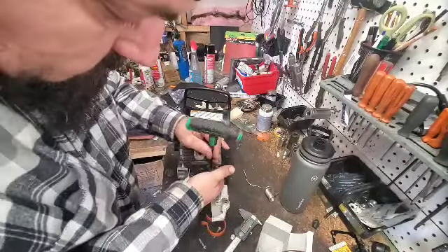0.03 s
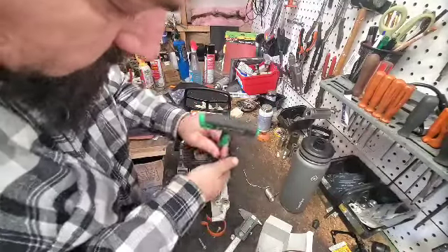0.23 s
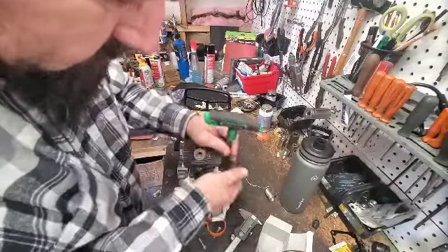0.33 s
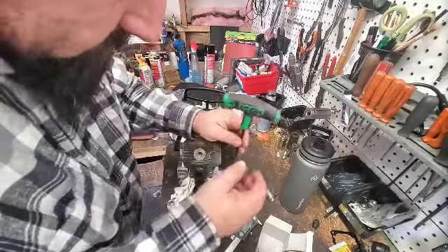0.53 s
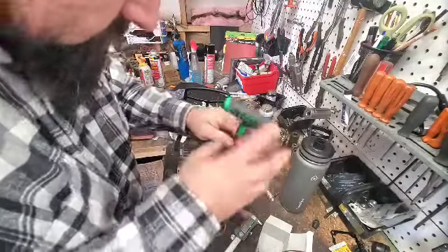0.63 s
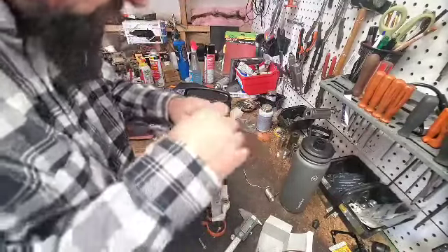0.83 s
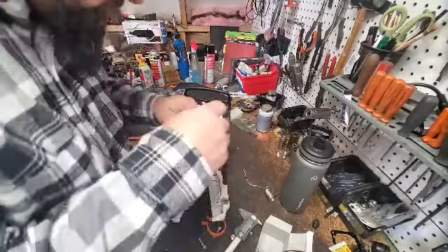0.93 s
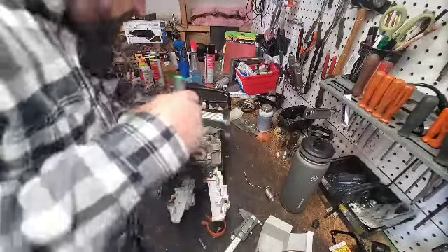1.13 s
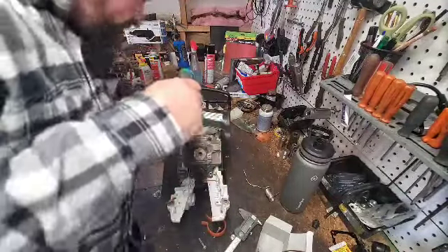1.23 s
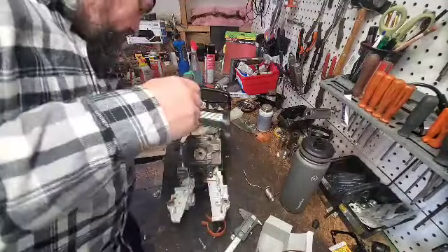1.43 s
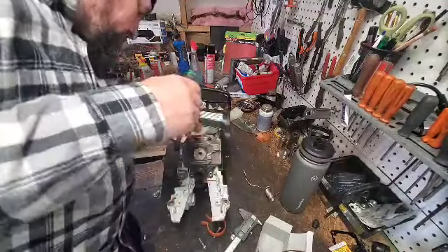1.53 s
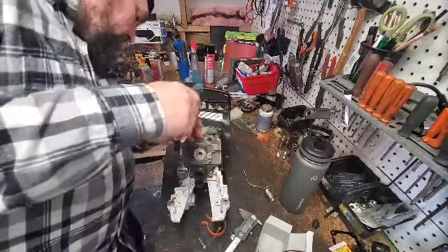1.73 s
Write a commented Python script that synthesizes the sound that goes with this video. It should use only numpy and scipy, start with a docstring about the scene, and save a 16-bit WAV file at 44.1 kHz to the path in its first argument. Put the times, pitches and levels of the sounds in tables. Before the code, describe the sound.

Small metal parts clink as a driver scrapes free, a bolt bounces, and a handle thuds down

```python
"""Engine parts on a shed workbench

A steel T-handle driver scrapes out of its hole and rings free, a loose bolt bounces, the driver's plastic
handle is put down and fingers tick on a small part: each is a damped noise burst plus ringing sine modes.
Scraping is dense random slips through a body's ringing. Coloured noise makes the bench shudder, the faint
sleeve, the room rumble and the hiss; the shed adds a short reverberation to the handling."""
import sys
import numpy as np
from scipy import signal
from scipy.fft import rfft, irfft
from scipy.io import wavfile

SR = 44100
rng = np.random.default_rng(int(sys.argv[2]) if len(sys.argv) > 2 else 0)


def unload_wav(signal):
    """Save mono or channel-first audio to the path in sys.argv[1] as 16-bit WAV at rate SR, clipped to [-1, 1]."""
    wavfile.write(
        sys.argv[1],
        SR,
        np.round(np.clip(np.atleast_2d(signal).T, -1, 1) * 32767).astype(np.int16),
    )


N = 79380
RING_S = 0.6
AGE_S = np.arange(int(RING_S * SR)) / SR

# left-right likeness: f/Hz, correlation
CORRELATION = [(40, .995), (90, .985), (180, .92), (350, .82), (700, .65), (1400, .15), (2800, .45),
               (5600, 0), (10000, -.2), (14000, .1)]


def from_db(db):
    """Decibels to gain."""
    return 10 ** (np.asarray(db) / 20)


def at_hz(points, hz):
    """Read a table on a log-frequency axis."""
    table_hz, values = np.array(points).T[:2]
    return np.interp(np.log(hz + 1), np.log(table_hz), values)


def level(curve):
    """A t/s, level/dB curve as gain; silent outside it."""
    times_s, levels_db = np.transpose(curve)
    return from_db(np.interp(np.arange(N) / SR, times_s, levels_db, left=-np.inf, right=-np.inf))


def dying(t60_s):
    """Exponential decay over the length of a ring: -60 dB at t60."""
    return np.exp(-np.log(1000) * AGE_S / t60_s)


def correlation_at(hz):
    """Left-right correlation at a frequency."""
    return np.clip(at_hz(CORRELATION, hz), -1, 1)


def noise(spectrum, size, tilt_db_per_oct=0, contact_hz=SR):
    """Stereo noise of a given colour, dulled by a soft contact; rms 1."""
    hz = np.fft.rfftfreq(size, 1 / SR)
    octaves = np.log2(np.clip(hz, 1000, None))  # tilt acts above 1 kHz only
    gain = from_db(at_hz(spectrum, hz) + tilt_db_per_oct * octaves)
    gain = gain / np.sqrt(1 + (hz / contact_hz) ** 8)
    alike = correlation_at(hz)
    mid, side = rfft(rng.standard_normal((2, size)))
    stereo = np.sqrt(1 + alike) * mid + np.sqrt(1 - alike) * side * [[1], [-1]]
    x = irfft(gain * stereo, size)
    return x / np.sqrt(np.mean(x ** 2))


def strike(spectrum, modes, t60_s, ring_db, tilt_db_per_oct=0, contact_hz=SR):
    """One blow: a crowd of quickly damped modes plus the body's few clear ones."""
    attack_s, mode_scatter_db = 0.00071, 0.93
    x = noise(spectrum, len(AGE_S), tilt_db_per_oct, contact_hz) * dying(t60_s)
    for hz, db, mode_t60_s in modes:
        # opposite phase shifts give the left-right correlation
        phase = np.arccos(correlation_at(hz)) / 2 * np.array([[1], [-1]])
        mode_gain = from_db(db + ring_db + mode_scatter_db * rng.standard_normal())
        x = x + mode_gain * np.sin(2 * np.pi * hz * AGE_S + phase) * dying(mode_t60_s)
    return np.sqrt(2) * x * (1 - np.exp(-AGE_S / attack_s))


def place(blows):
    """Lay (t/s, level/dB, sound) blows on the time line."""
    out = np.zeros((2, N + len(AGE_S)))
    for s, db, x in blows:
        start = min(int(s * SR), N)
        out[:, start:start + len(AGE_S)] += from_db(db) * x
    return out[:, :N]


def clinks(hits, spectrum, modes, t60_s):
    """A series of hard contacts on one metal body."""
    return place((s, db, strike(spectrum, modes, t60_s, ring_db, tilt_db_per_oct=tilt))
                 for s, db, tilt, ring_db in hits)


def convolve_unit_energy(x, response):
    """Convolve with a stereo response scaled to unit mean energy per channel."""
    response = response / np.sqrt(np.sum(response ** 2) / 2)
    return signal.fftconvolve(x, response, axes=1)[:, :N]


def scrape(force_db, body):
    """Dense tiny slips, scaled by the force on them, excite a body."""
    slips_per_s, slip_spread_db = 1200, -4.5
    happens = rng.random(N) < slips_per_s / SR
    sign = rng.choice([-1, 1], N)
    size = from_db(slip_spread_db * np.minimum(rng.exponential(1, N), 3))
    slips = happens * sign * size
    return convolve_unit_energy([level(force_db) * slips / slips.std()], body)


def room_floor():
    """Steady room rumble and hiss: coloured noise."""
    # room colour: f/Hz, relative level/(dB/Hz)
    floor_colour = [(22, -22), (33, -19), (44, 4), (60, 4), (80, 0.13), (100, -7), (140, -19), (220, -26),
                    (380, -25), (550, -39), (1000, -47), (2500, -50), (4500, -49), (6700, -47), (7700, -54),
                    (11000, -53), (15000, -51)]
    return from_db(-47) * noise(floor_colour, N)


def bench_rumble():
    """The bench top shudders softly under the hands: low noise of varying level."""
    # shudder level: t/s, level/dB
    shudder_levels = [(.08, -55), (.14, -45), (.27, -45), (.39, -44.5), (.55, -48.5), (.66, -58),
                      (.76, -48), (.86, -51), (.90, -75)]
    # shudder colour: f/Hz, relative level/(dB/Hz)
    shudder_colour = [(30, -22), (50, 1.5), (85, 3), (125, -9), (165, -8.5), (220, -25.5), (380, -11),
                      (520, -32), (1000, -34.5), (4000, -64.5)]
    return level(shudder_levels) * noise(shudder_colour, N)


def sleeve():
    """A flannel sleeve brushes faintly as the arm reaches across: bright noise of varying level."""
    # rustle level: t/s, level/dB
    rustle_levels = [(.79, -75), (.84, -57.5), (.96, -70), (1.03, -84.5), (1.12, -72), (1.30, -70.5),
                     (1.39, -83)]
    # rustle colour: f/Hz, relative level/(dB/Hz)
    rustle_colour = [(1000, -5), (2500, -6.5), (5500, 4), (8500, -4.5), (14000, 0)]
    return level(rustle_levels) * noise(rustle_colour, N)


def shed(x):
    """Short diffuse reverberation of a cluttered room: decaying noise with a soft onset."""
    t60_s, reverb_db, build_s = 0.18, -8.5, 0.0023
    # reverberation colour: f/Hz, level/dB
    reverb_colour = [(200, 0), (1000, -5.5), (2200, 0.5), (4000, 4), (7000, -4.5), (15000, 1.5)]
    build = 1 - np.exp(-(AGE_S / build_s) ** 2)
    tail = noise(reverb_colour, len(AGE_S)) * dying(t60_s) * build
    return from_db(reverb_db) * convolve_unit_energy(x, tail)


def lean(x):
    """The bench lies to the left: tip the balance by frequency."""
    # left minus right: f/Hz, level/dB
    balance = [(150, -3), (350, 4), (700, 6.5), (1400, 5.5), (2800, 1.1), (5600, 4), (10000, 4.5),
               (15000, 8)]
    db = at_hz(balance, np.fft.rfftfreq(2 * N, 1 / SR))
    return irfft(rfft(x, 2 * N) * from_db(np.array([db, -db]) / 2))[:, :N]


def small_part():
    """A small metal part ticks and slides briefly under the fingers, ringing its modes."""
    t60_s, slide_ring_db, slide_tilt_db_per_oct = 0.032, -4.5, -10
    # finger ticks: t/s, level/dB, tilt/(dB/octave), free ringing/dB
    part_hits = [(1.5062, -47, 6, 8), (1.519, -47, 7, -29), (1.78, -70.5, -13, 13)]
    # dense short ringing: f/Hz, relative level/(dB/Hz)
    part_colour = [(400, -57), (1600, -23), (2200, -9.5), (3800, -3.5), (5500, 0), (6800, 7), (8000, -16.5),
                   (10400, -7), (11500, -19), (13000, -23), (15500, -28)]
    # clear modes: f/Hz, level/dB, t60/s
    part_modes = [(2110, -22, .09), (3220, -26, .16), (3800, -22, .1), (6444, -11, .08), (6880, -9, .14),
                  (10380, -15, .12), (12890, -23, .12)]
    # sliding force: t/s, level/dB
    slide_force = [(1.51, -58.5), (1.535, -61), (1.575, -61.5), (1.60, -64.5), (1.635, -70.5), (1.68, -82)]
    body = strike(part_colour, part_modes, t60_s, slide_ring_db, tilt_db_per_oct=slide_tilt_db_per_oct)
    return scrape(slide_force, body) + clinks(part_hits, part_colour, part_modes, t60_s)


def driver_handle():
    """The plastic handle lands and rocks on the bench top; soft contact dulls the bench's ringing."""
    t60_s = 0.053
    # knocks: t/s, level/dB, contact cut-off f/Hz, free ringing/dB
    handle_hits = [(0.7023, -25, 3620, -1), (.714, -20.5, 3806, 0.5), (.740, -26, 4150, -28),
                   (0.8076, -27.5, 2830, -1), (0.8417, -31.5, 4470, -4)]
    # dense short ringing of the bench: f/Hz, relative level/(dB/Hz)
    bench_colour = [(120, -20), (250, -26.5), (370, -2), (600, -13), (780, 3), (1300, 2.5), (1900, -2.5),
                    (2500, -2.5), (3600, -7), (4200, -8), (5000, -10), (7000, -13), (15000, -16.5)]
    # clear bench modes: f/Hz, level/dB, t60/s
    bench_modes = [(305, -23, .12), (373, -16, .14), (420, -21, .1), (506, -16, .13), (680, -12, .07),
                   (716, -6, .1), (810, -12, .09), (870, -12, .09), (1030, -11, .07), (1242, -7, .09),
                   (1326, -11, .1), (1480, -14, .09), (1701, -17, .1), (1825, -17, .1), (2463, -14, .12)]
    return place((s, db, strike(bench_colour, bench_modes, t60_s, ring_db, contact_hz=hz))
                 for s, db, hz, ring_db in handle_hits)


def bolt():
    """The bolt falls and bounces with bright, short clinks of its own modes, also waking a few low modes of the
    bench."""
    # bounces: t/s, level/dB, tilt/(dB/octave), free ringing/dB
    bolt_hits = [(.3742, -18.5, -5.5, -3.5), (.3968, -19.5, 9.5, -11.5), (.4108, -11, -1, -2.5),
                 (.4498, -20, -4, -1.5), (.4968, -13, 0, -2.5), (.5612, -28.5, -7, -9)]
    # dense short ringing: f/Hz, relative level/(dB/Hz)
    bolt_colour = [(200, -24.5), (550, -34), (740, -15.5), (900, -24.5), (1150, -10.5), (1900, -14),
                   (2500, -5), (3600, 2.5), (5000, -3.5), (6300, 8.5), (7500, 0), (9500, -5), (10600, -8),
                   (11400, 4), (12800, -13), (14300, -0.5), (16000, -15.5)]
    # clear modes: f/Hz, level/dB, t60/s
    bolt_modes = [(730, -26, .09), (1130, -21, .08), (1240, -26, .09), (2090, -27, .1), (2400, -22, .1),
                  (3667, -20, .11), (3692, -20, .11), (5630, -16, .14), (6196, -11, .14), (6235, -14, .13),
                  (6328, -16, .14), (6666, -16, .13), (7120, -16, .14), (11400, -20, .12), (14826, -20, .3),
                  (14880, -24, .25)]
    return clinks(bolt_hits, bolt_colour, bolt_modes, t60_s=0.048)


def driver_shaft():
    """The shaft scrapes out of its hole, catches on edges, and taps once more as it is put down."""
    t60_s, scrape_ring_db = 0.043, -12.5
    # edge catches: t/s, level/dB, tilt/(dB/octave), contact cut-off f/Hz, free ringing/dB
    shaft_hits = [(0.128, -47, -6.5, 14000, -13), (0.149, -41, -6.5, 9000, -13),
                  (0.168, -37.5, -3.5, 18000, -12.5), (0.189, -28, 4.5, 18000, -14),
                  (0.208, -34.5, 1.5, 18000, -8), (0.2359, -26, 4, 18000, -2.5),
                  (0.2646, -20, 2, 18000, -4), (0.7387, -27, 4.5, 7500, -32)]
    # scraping force: t/s, level/dB
    scrape_force = [(.11, -75.5), (.135, -51.5), (.165, -45.5), (.185, -38), (.215, -29.5), (.243, -23.5),
                    (.26, -37), (.272, -42), (.285, -90.5)]
    # dense short ringing: f/Hz, relative level/(dB/Hz)
    shaft_colour = [(150, 0), (400, -15), (700, -13), (1000, -13), (1300, -11.5), (1800, -17), (2600, -8.5),
                    (3600, -3), (5200, -2.5), (7000, 4.5), (8100, -17), (11000, -6), (15000, -9.5)]
    # clear modes: f/Hz, level/dB, t60/s
    shaft_modes = [(3117, -16, .4), (3208, -4, .27), (3596, -16, .13), (4086, -14, .14), (4506, -18, .12),
                   (6352, -13, .15), (6630, -16, .17), (6880, -14, .11), (11150, -20, .1)]
    slide = scrape(scrape_force, strike(shaft_colour, shaft_modes, t60_s, scrape_ring_db))
    taps = place((s, db, strike(shaft_colour, shaft_modes, t60_s, ring_db, tilt, hz))
                 for s, db, tilt, hz, ring_db in shaft_hits)
    return slide + taps


def scene():
    """All handling sounds in the shed, over its rumble and hiss."""
    background = room_floor() + bench_rumble() + sleeve()
    handling = small_part() + lean(driver_handle() + bolt() + driver_shaft())
    return background + handling + shed(handling)


def record(dry):
    """Peaks stop at full scale, then the top is cut."""
    cutoff_hz = 15900
    lowpass = signal.firwin(201, cutoff_hz, fs=SR, window=("kaiser", 8))
    return signal.fftconvolve(np.clip(dry, -1, 1), [lowpass], "same", axes=1)


dry = scene()
out = record(dry)
unload_wav(out)
```